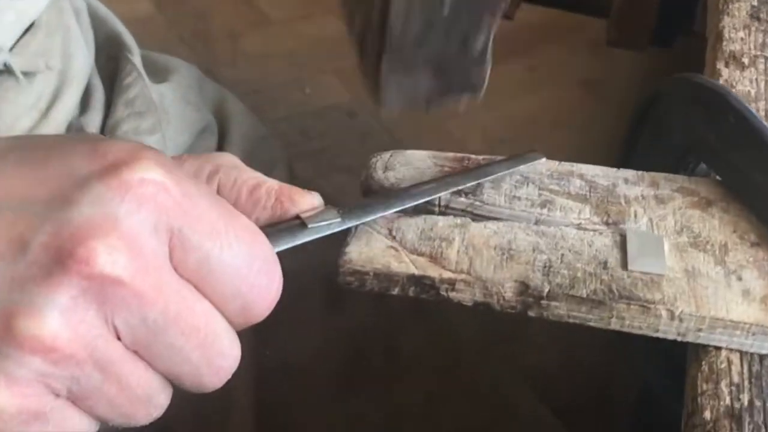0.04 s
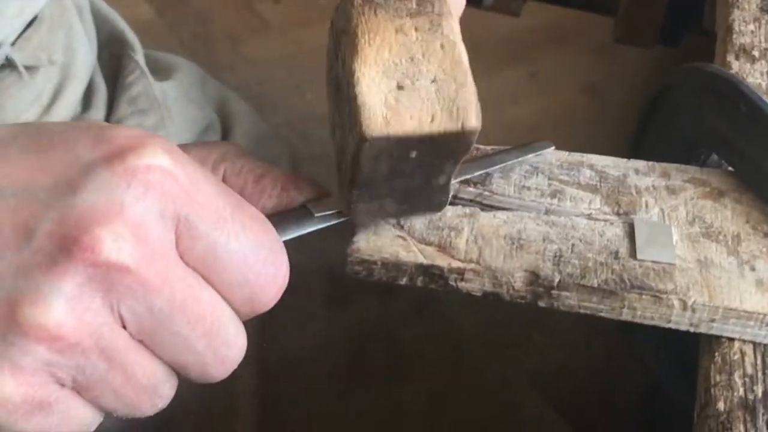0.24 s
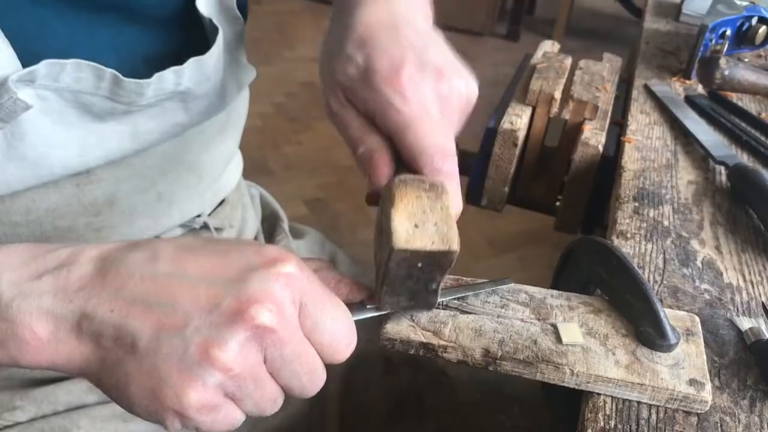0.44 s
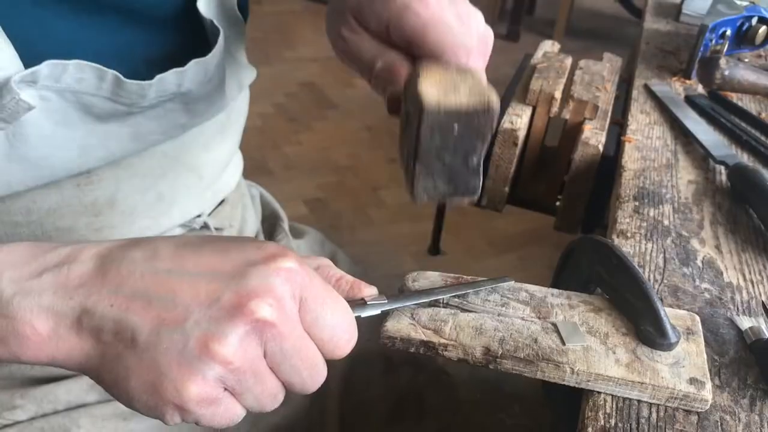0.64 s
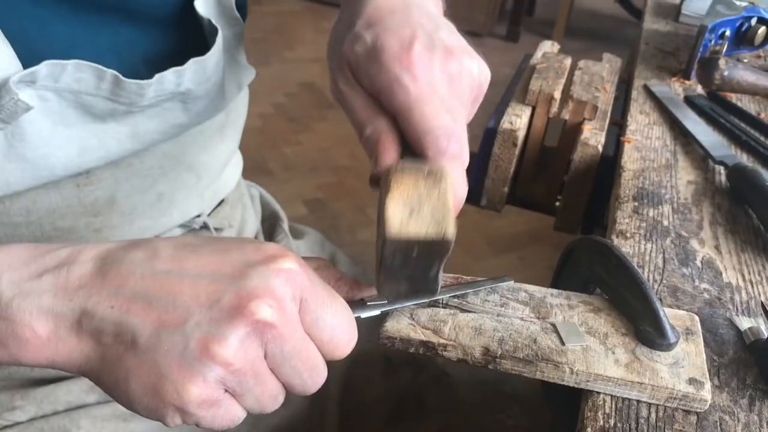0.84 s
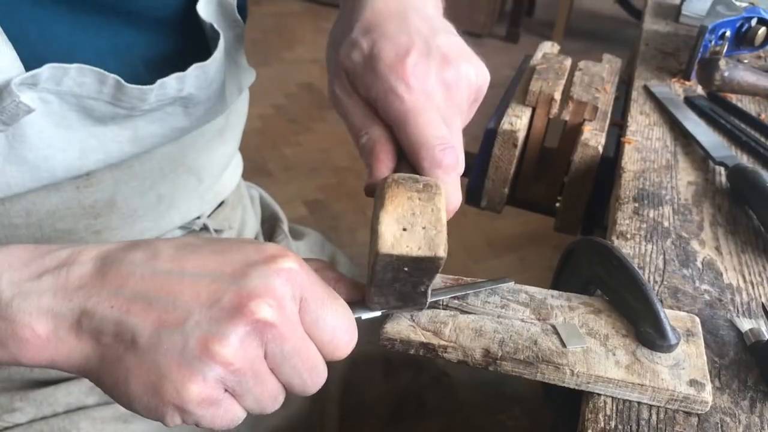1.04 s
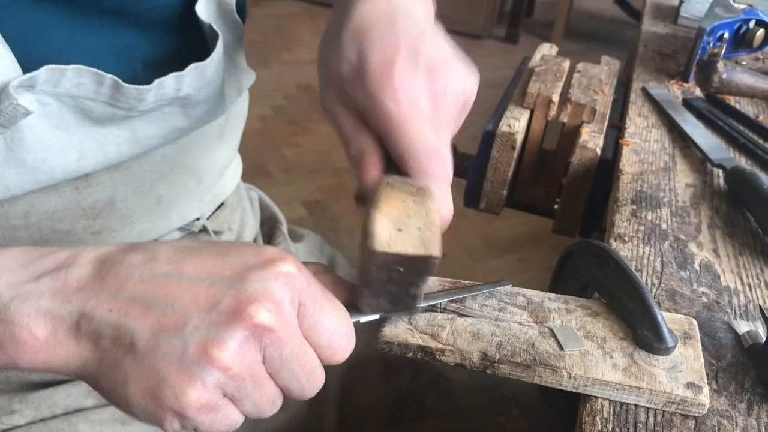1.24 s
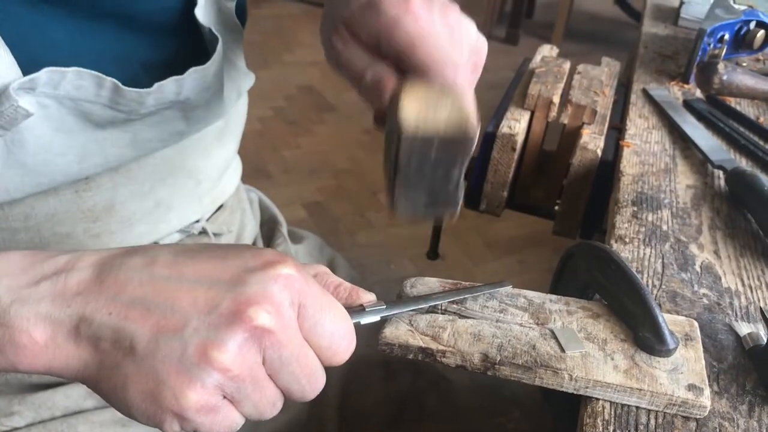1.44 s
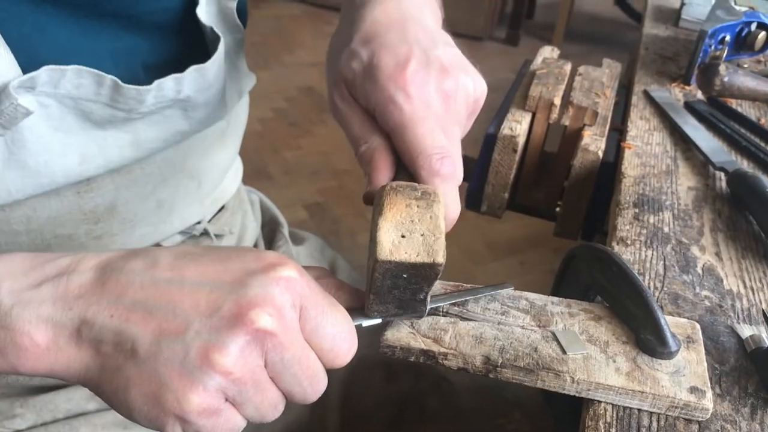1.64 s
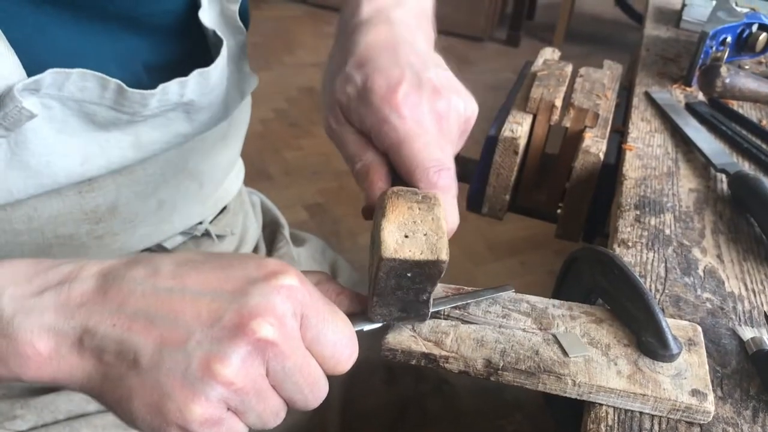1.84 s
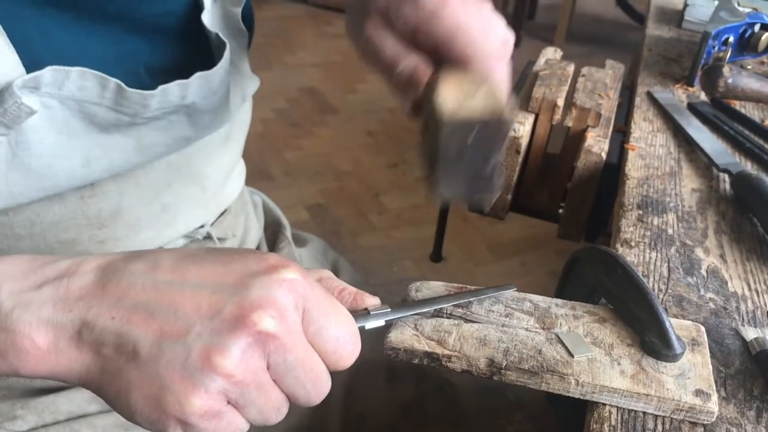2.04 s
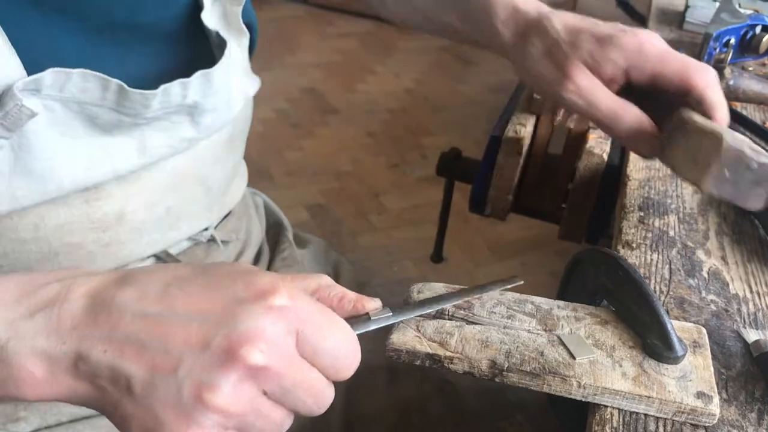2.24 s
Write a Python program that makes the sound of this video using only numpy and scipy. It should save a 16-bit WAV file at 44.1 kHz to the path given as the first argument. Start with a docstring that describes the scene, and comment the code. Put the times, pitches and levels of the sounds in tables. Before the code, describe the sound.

A wooden mallet taps a metal strip on a steel mandrel, seven quick even knocks in a workshop

```python
"""First comes the fading echo of a blow struck just before the start, over a faint low hum.
Then a wooden mallet taps a thin metal strip round a steel mandrel resting on a wooden bench peg.
Each blow is a noise crack with a damped ring of partials, then a low thump of the peg.
Short noise buzzes with steel partials are the mandrel chattering as it settles.
A small workshop answers with decaying noise, partly shaped by the blow's own partials."""
import sys
import numpy as np
from scipy import signal
from scipy.fft import rfft, irfft
from scipy.io import wavfile
from scipy.ndimage import uniform_filter1d, minimum_filter1d

SR = 44100
rng = np.random.default_rng(int(sys.argv[2]) if len(sys.argv) > 2 else 0)


def wav_out(sig):
    """Save sig, one row per channel (or a flat mono array), as 16-bit PCM at SR to the path in sys.argv[1]."""
    wavfile.write(sys.argv[1], SR, np.round(np.clip(np.atleast_2d(sig).T, -1, 1) * 32767).astype(np.int16))


N = 100415
T = np.arange(int(0.7 * SR)) / SR  # time within one sound [s]


def amp(db):
    """Turns decibels into a gain."""
    return 10 ** (np.asarray(db) / 20)


def read(points, hz):
    """Reads a table between its points, on a logarithmic frequency axis."""
    f, value = np.transpose(points)
    return np.interp(np.log(hz + 1), np.log(f), value)


def add(mix, s, sound):
    """Adds a sound at time s, cutting off whatever lies outside the mix."""
    at = round(s * SR)
    sound = sound[max(-at, 0):]
    part = mix[max(at, 0):][:len(sound)]
    part += sound[:len(part)]


def colour(x, points):
    """Boosts or cuts each frequency by a gain table, without sounding before the input."""
    size = 2 * len(x)
    hz = abs(np.fft.fftfreq(size, 1 / SR))
    log_gain = np.log(amp(read(points, hz)))
    # the Hilbert transform gives the phase that makes the filter minimum-phase
    response = np.exp(np.conj(signal.hilbert(log_gain)))[:size // 2 + 1]
    return irfft(rfft(x, size) * response)[:len(x)]


def noise(points, size):
    """Random hiss with the given spectrum, scaled to an rms of 1."""
    gain = amp(read(points, np.fft.rfftfreq(size, 1 / SR)))
    x = irfft(rfft(rng.standard_normal(size)) * gain, size)
    return x / x.std()


def fade(t60, hold=0):
    """Holds full level, then falls by 60 dB in t60 seconds."""
    return 1000 ** (-np.maximum(T - hold, 0) / t60)


def rise(s):
    """Smooth onset that takes about s seconds."""
    return 1 - np.exp(-(T / s) ** 2)


def mode(hz, t60):
    """One dying partial: a sine with a random starting phase."""
    return fade(t60) * np.sin(2 * np.pi * (hz * T + rng.random()))


def swing(hz, delay, swell, sharpness):
    """A tone that swells to its peak in swell seconds after the delay, then dies away."""
    t = np.maximum(T - delay, 0)
    envelope = (t / swell * np.exp(1 - t / swell)) ** sharpness
    return envelope * np.cos(2 * np.pi * hz * t)


# spectrum of the contact crack: (frequency [Hz], relative level [dB])
CRACK_SPECTRUM = [(150, -13.5), (500, 16), (1200, 2), (2500, 7.5), (3400, 12), (5000, 1.5), (8000, -5),
                  (11000, -5.5), (13000, -23), (16000, -20)]
CRACK_DB, CRACK_HOLD_S, CRACK_T60_S = -22, 0.0051, 0.016
# mallet, strip and mandrel together: (frequency before pitch factor [Hz], mean level [dB], t60 [s])
RING_PARTIALS = [(807, -35.5, 0.12), (942, -29, 0.031), (1215, -23.5, 0.027), (1573, -26, 0.028),
                 (1915, -22, 0.03), (2263, -24, 0.022), (3038, -19, 0.022), (3748, -16.5, 0.022),
                 (4460, -29, 0.027), (5285, -35.5, 0.033), (6584, -41, 0.041), (10200, -46, 0.012)]
RING_SCATTER_DB = 4  # random spread of each partial's level
ONSET_S = 0.00082  # onset of strike and chatter
KNOCK_HZ, KNOCK_T60_S, KNOCK_RISE_S = 1426, 0.03, 0.00045


def strike(pitch, knock_db):
    """Contact noise, the hand-damped ring of wood and steel, and the mallet's hollow knock."""
    crack = amp(CRACK_DB) * noise(CRACK_SPECTRUM, len(T)) * fade(CRACK_T60_S, CRACK_HOLD_S)
    ring = 0
    for hz, db, t60 in RING_PARTIALS:
        level_db = db + RING_SCATTER_DB * rng.standard_normal()
        ring = ring + amp(level_db) * mode(hz * pitch, t60)
    knock = amp(knock_db) * mode(KNOCK_HZ, KNOCK_T60_S) * rise(KNOCK_RISE_S)
    return (crack + ring) * rise(ONSET_S) + knock


# spectrum of the first tick: (frequency [Hz], relative level [dB])
TICK_SPECTRUM = [(300, -12.5), (1500, 10), (3000, -9), (6000, -5), (10500, -5), (15000, -10.5),
                 (17000, -13)]
TICK_HOLD_S, TICK_T60_S = 0.00036, 0.006


def tick(db):
    """The first tick of wood on metal: a very short burst of noise."""
    return amp(db) * noise(TICK_SPECTRUM, len(T)) * fade(TICK_T60_S, TICK_HOLD_S)


# thump of the bench peg:
# (frequency [Hz], relative level [dB], delay [s], time to swell [s], sharpness of the swell [power])
PEG_SWINGS = [(307.3, -11, .001, 0.0062, 3.68), (502.5, -29, 0.00128, 0.011, 4.1)]
# the bench booms on: (mean frequency [Hz], relative level [dB], t60 [s])
BENCH_PARTIALS = [(222.6, -31.5, 0.33), (269.5, -34, .6), (329.6, -42, 0.83), (362, -38, 0.64),
                  (505, -43.5, 0.45), (955, -41, 0.53)]
BENCH_RISE_S = 0.012
BENCH_DETUNE = 0.01237  # random spread of pitch, as a fraction
# the thump comes back from floor and walls: (delay [s], level against the thump [dB])
THUMP_REFLECTIONS = [(0.0192, -14), (0.0316, -21), (.049, -21), (0.0701, -18), (0.121, -21), (0.145, -32.5)]
# deep thud of the bench; each blow shifts its level
THUD_HZ, THUD_DB, THUD_DELAY_S, THUD_SWELL_S, THUD_SHARPNESS = 130, -32, 0.005, 0.013, 1.8


def peg(thump_db, thud_db):
    """The peg swings, echoes off floor and walls, and leaves the bench booming over a deep thud."""
    thump = sum(amp(db) * swing(hz, delay, swell, sharpness)
                for hz, db, delay, swell, sharpness in PEG_SWINGS)
    boom = 0
    for hz, db, t60 in BENCH_PARTIALS:
        detuned_hz = hz * (1 + BENCH_DETUNE * rng.standard_normal())
        boom = boom + amp(db) * mode(detuned_hz, t60)
    after = boom * rise(BENCH_RISE_S)
    for delay, db in THUMP_REFLECTIONS:
        add(after, delay, amp(db) * thump)
    thud = swing(THUD_HZ, THUD_DELAY_S, THUD_SWELL_S, THUD_SHARPNESS)
    return amp(thump_db) * (thump + after) + amp(THUD_DB + thud_db) * thud


# spectrum of the chatter's buzz: (frequency [Hz], relative level [dB])
RATTLE_SPECTRUM = [(500, -1), (2300, 8.5), (3500, 6), (5500, 3), (8000, -3), (11000, -0.5), (13000, -13),
                   (16000, -18.5)]
# free ring of the mandrel: (frequency [Hz], relative level [dB])
STEEL_PARTIALS = [(3020, 1), (5400, -13), (9350, -5), (9650, -10.5), (12800, -14)]
STEEL_T60_S, CHATTER_T60_S = 0.025, 0.014


def chatter(db, length, ring_db):
    """A brief noise buzz of steel against strip and peg, with the mandrel's ring."""
    buzz = amp(db) * noise(RATTLE_SPECTRUM, len(T)) * fade(CHATTER_T60_S, length)
    ring = sum(amp(ring_db + level) * mode(hz, STEEL_T60_S) for hz, level in STEEL_PARTIALS)
    return (buzz + ring) * rise(ONSET_S)


# near reflections off bench and walls: (frequency [Hz], relative level [dB])
EARLY_SPECTRUM = [(60, -15), (110, 3.5), (170, -7), (290, 11), (430, 1), (950, 6.5), (1600, -1.5),
                  (2500, -9), (3300, -10), (6000, -18), (10000, -25.5), (16000, -37)]
EARLY_DB, EARLY_T60_S, EARLY_RISE_S = -20.5, 0.18, 0.0042
# workshop reverberation: (frequency [Hz], relative level [dB], t60 [s])
ROOM_BANDS = [(60, -3, 0.24), (170, 9.5, 0.21), (278, 6.5, 1), (480, 1.5, 0.67), (970, 4, 0.88),
              (2090, 0.5, 0.66), (4620, -9, 0.67), (5760, -15.5, 0.57), (8670, -19, 0.51),
              (15600, -28, 0.13)]
ROOM_DB, ROOM_RISE_S = -32, 0.02


def workshop():
    """Dense near reflections, then a noise tail in which each pitch range dies at its own rate."""
    room = np.array(ROOM_BANDS)
    level_table, t60_table = room[:, :2], room[:, ::2]
    hz, t, bands = signal.stft(noise(level_table, len(T)), SR, nperseg=512)
    bands = bands * 1000 ** (-t / read(t60_table, hz)[:, None])
    tail = signal.istft(bands, SR, nperseg=512)[1][:len(T)]
    early = noise(EARLY_SPECTRUM, len(T)) * fade(EARLY_T60_S) * rise(EARLY_RISE_S)
    return amp(EARLY_DB) * early + amp(ROOM_DB) * tail * rise(ROOM_RISE_S)


PARTIAL_SPREAD_HZ = 880  # peaks narrower than this still stand out in the echo


def excite(room, blow):
    """The room rings on with the blow's own partials, keeping its broad colour."""
    size = 2 * len(T)
    partials = rfft(blow, size)
    broad_power = uniform_filter1d(abs(partials) ** 2, int(PARTIAL_SPREAD_HZ * size / SR))
    relief = partials / np.sqrt(abs(broad_power) + 1e-9)
    return irfft(rfft(room, size) * relief, size)[:len(T)]


# spectrum of the still air in the workshop: (frequency [Hz], relative level [dB])
AIR_SPECTRUM = [(20, -19), (45, -5.5), (75, 2.5), (105, -4.5), (160, -7), (300, 6.5), (600, -11),
                (1500, -12.5), (4000, -22.5), (8000, -38.5), (16000, -46.5)]
AIR_DB = -52.5


def still_air():
    """Steady, faint noise of the air in the workshop."""
    return amp(AIR_DB) * noise(AIR_SPECTRUM, N)


HUM_HZ = 47.6
# swelling and sinking of the hum: (time [s], level [dB])
HUM_LEVELS = [(0, -68), (.4, -72), (.65, -56), (1.55, -51), (1.7, -60), (2.0, -76), (2.25, -48.5)]


def hum():
    """A low sine whose level swells and sinks."""
    t = np.arange(N) / SR
    level_db = np.interp(t, *np.transpose(HUM_LEVELS))
    return amp(level_db) * np.sin(2 * np.pi * HUM_HZ * t)


# the blows; the first falls just before the start, so only its echo is heard:
# (time [s], peg thump [dB], deep thud [dB], clack gain at 1.4 kHz [dB], ring gain at 3.3 kHz [dB],
#  treble gain at 10 kHz [dB], first tick [dB], pitch factor of the ring [ratio],
#  hollow knock of the mallet before the gains [dB], room [dB])
BLOW_EVENTS = [(-0.105, -2.5, 0, 3.5, -0.5, 1.5, -20, 1.0, -17, -2.5),
               (0.1718, -2, -3, 1.5, -3, 2, -29, 0.85, -11.5, -0.5),
               (0.4916, 0.5, -3, 2, 0.5, 5, -14.5, 0.99, -26, -2.5),
               (0.7621, 0, -4.5, -1.5, -1.5, 0.5, -20.5, 0.94, -27, -1),
               (1.0269, 0.5, -5.5, -1.5, -3.5, 2, -19.5, 0.99, -18, -2),
               (1.2996, 0.5, -7, 1.5, 2, 6, -18, 1.0, -22, -2.5),
               (1.5884, -1, 0, -2.5, 4, 1.5, -12.5, 1.003, -18, 0),
               (1.8843, 0.5, 0, -3, 2, -0.5, -23, 1.0, -21, 2)]
# the mandrel chatters on the peg:
# (time [s], buzz level [dB], hold before the buzz fades [s], ring of the steel [dB])
CHATTER_EVENTS = [(0.19, -28, 0.0014, -38), (0.218, -44, 0.0023, -60), (0.508, -47, 0.0023, -27),
                  (0.5162, -31.5, 0.00067, -30), (0.7816, -32, .003, -33), (1.0507, -32.5, 0.0024, -21.5),
                  (1.3533, -38, 0.006, -31), (1.624, -45, 0.004, -40)]
ROOM_SAME = 0.57  # share of echo power that repeats at every blow


def scene():
    """Every blow has its own colour; its echo is partly the same each time."""
    mix = still_air() + hum()
    same_echo = workshop()
    for (s, thump_db, thud_db, clack_db, ring_db, treble_db,
         tick_db, pitch, knock_db, room_db) in BLOW_EVENTS:
        blow = strike(pitch, knock_db)
        own_echo = excite(workshop(), blow)
        room = np.sqrt(ROOM_SAME) * same_echo + np.sqrt(1 - ROOM_SAME) * own_echo
        tone = [(500, 0), (1400, clack_db), (3300, ring_db), (10000, treble_db)]  # (Hz, dB)
        coloured = colour(blow + amp(room_db) * room, tone)
        add(mix, s, tick(tick_db) + coloured + peg(thump_db, thud_db))
    for s, db, length, ring_db in CHATTER_EVENTS:
        add(mix, s, chatter(db, length, ring_db))
    return mix[None]


CEILING_DB, LIMITER_S = -10, 0.0015  # limiter's ceiling and smoothing window
EDGE_HZ = 15800  # top of the band


def record(dry):
    """A fast limiter turns down peaks above the ceiling; then a low-pass removes the top treble."""
    size = 2 * max(round(LIMITER_S * SR / 2), 1) + 1
    needed_gain = np.minimum(1, amp(CEILING_DB) / (abs(dry) + 1e-9))
    # hold the lowest gain across the window, then smooth it
    gain = uniform_filter1d(minimum_filter1d(needed_gain, size), size)
    low_pass = signal.firwin(511, EDGE_HZ, window=("kaiser", 9), fs=SR)
    return signal.oaconvolve(dry * gain, low_pass[None], "same")


dry = scene()
out = record(dry)
wav_out(out)
```